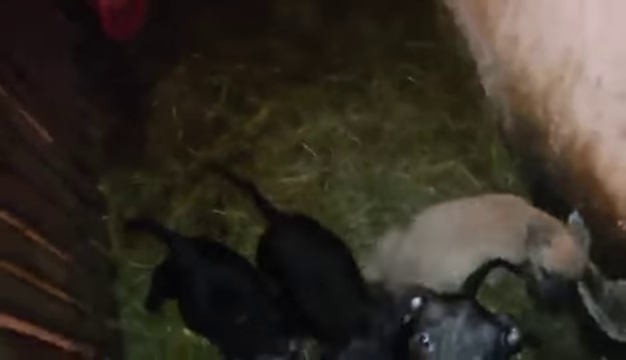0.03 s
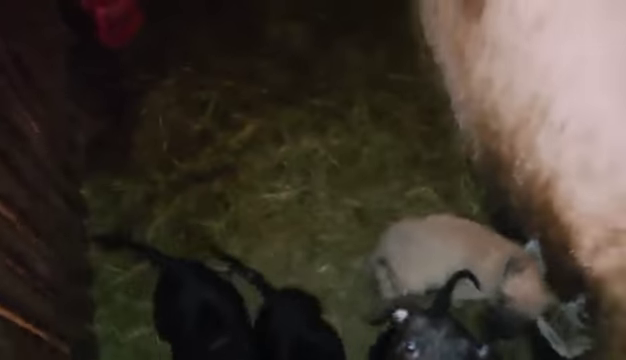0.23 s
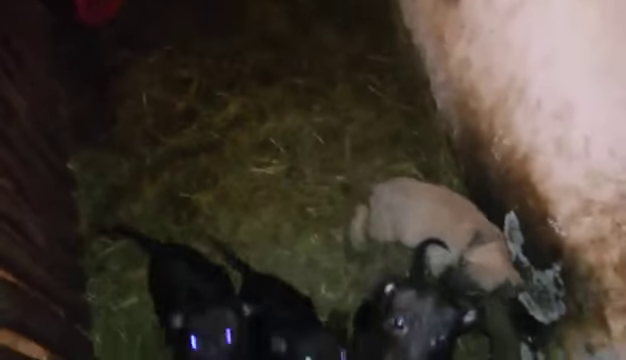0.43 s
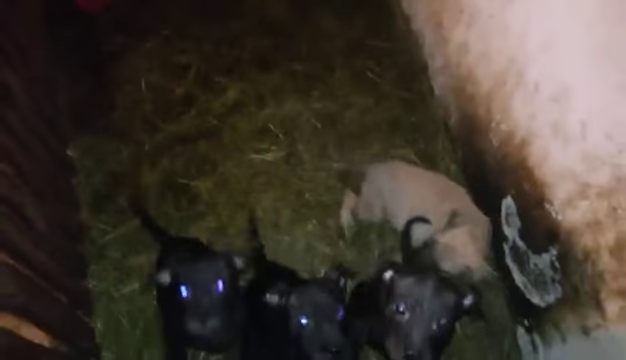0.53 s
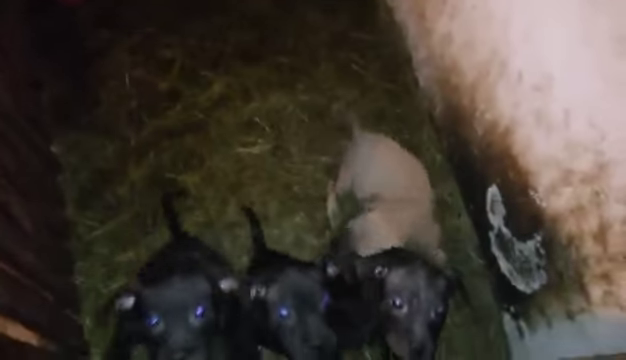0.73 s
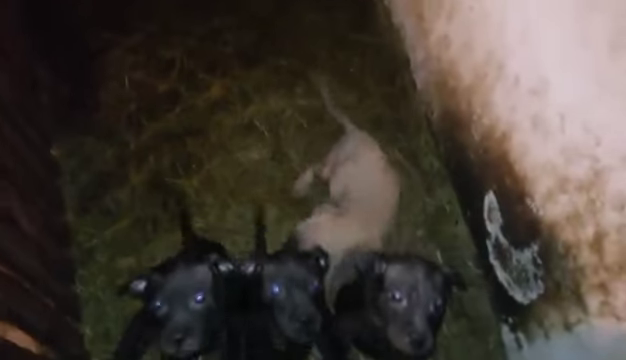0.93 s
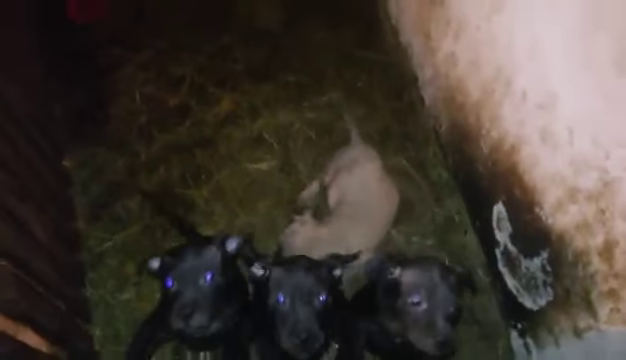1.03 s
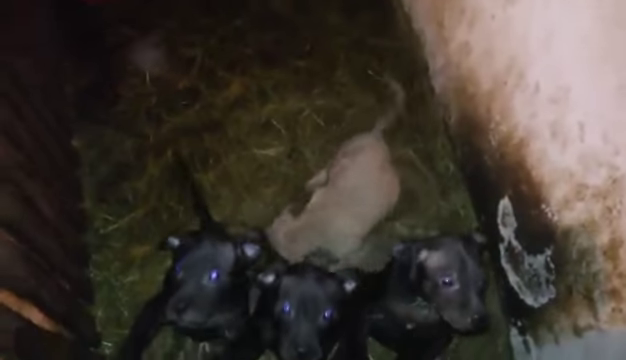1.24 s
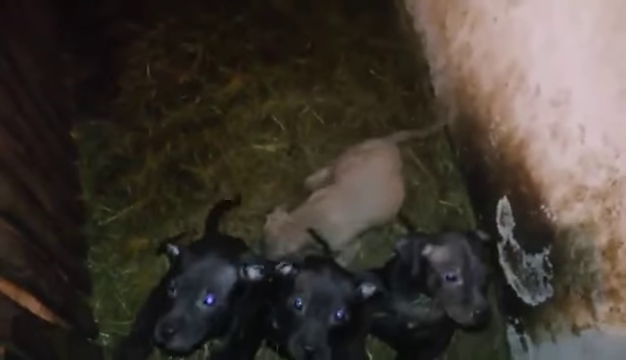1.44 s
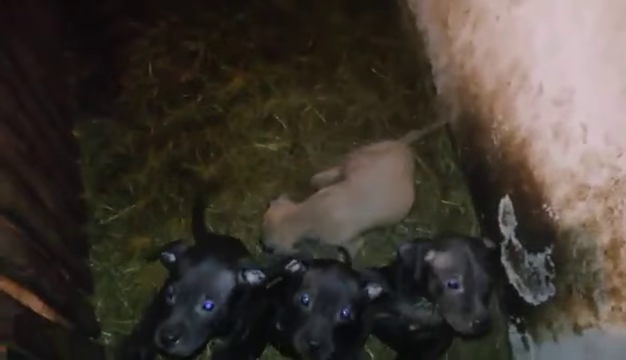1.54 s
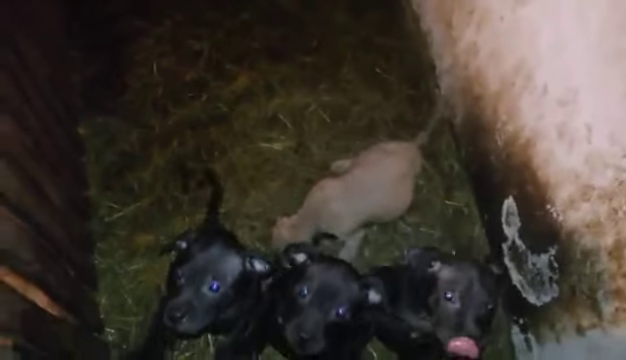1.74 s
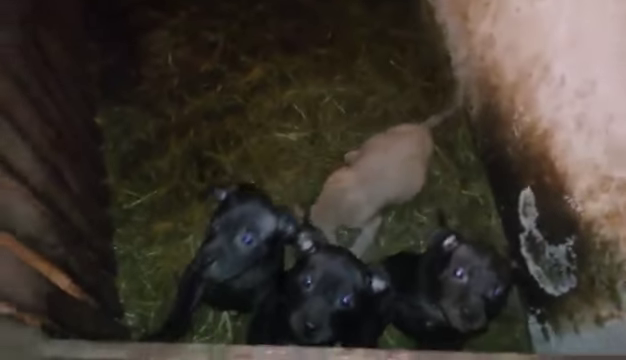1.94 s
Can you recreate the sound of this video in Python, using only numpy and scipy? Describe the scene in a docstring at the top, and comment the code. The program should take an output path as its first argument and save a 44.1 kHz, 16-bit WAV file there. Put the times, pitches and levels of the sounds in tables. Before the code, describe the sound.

Puppies rustle and crunch through straw in a small hard-walled pen, with snaps and knocks

```python
"""Straw snaps, crunches and rustles under puppies shuffling about a small hard-walled pen, close to the microphone.
Stalks and dragging paws are bursts of tiny random fractures; snaps and squeaks add narrow resonances.
Knocks ring the modes of the boards, and two soft taps right by the microphone are thuds of sagging pitch.
The pen adds a short, dense ring of decaying noise over still air, a low rumble and a faint hum."""
import sys
import numpy as np
from scipy import signal
from scipy.fft import rfft, irfft
from scipy.io import wavfile
from scipy.ndimage import uniform_filter1d

SR = 44100
rng = np.random.default_rng(int(sys.argv[2]) if len(sys.argv) > 2 else 0)


def inscribe(sig):
    """Save sig as 16-bit PCM at rate SR to the path in sys.argv[1].

    A 1-D sig is mono; a 2-D sig holds one channel per row.
    Samples are clipped to [-1, 1] before scaling.
    """
    pcm = np.round(np.clip(np.atleast_2d(sig).T, -1, 1) * 32767)
    wavfile.write(sys.argv[1], SR, pcm.astype(np.int16))


N = 88200  # 2 s

# Levels of sounds inside the pen are those sent to its walls.
# sharp snaps of straw and claws [t/s, level/dB, ring f/Hz, ring level/dB re the crack, tilt/dB per octave]
SNAPS = [(0.217, -21.5, 3493, -2.5, -4.5), (.425, -35, 3343, 5.5, -9), (0.559, -32.5, 3843, 2, 12.5),
         (0.688, -30, 3324, 7, 16.5), (.7655, -28.5, 3190, -0.5, -6), (.7835, -18.5, 4640, -33, 4.5),
         (.7955, -16.5, 4360, -1.5, 2), (0.928, -28.5, 3510, -4.5, 12), (.945, -16, 8150, -1.5, 0),
         (.962, -24.5, 4430, 4.5, 4), (.969, -25, 8250, 20, 14.5), (1.067, -25.5, 3780, -2, -0.5),
         (1.149, -38, 4720, -24, 2.5), (1.196, -35, 2200, -7, 0), (1.332, -40, 4200, -19.5, 9.5),
         (1.349, -27.5, 3354, 5.5, 5), (1.386, -29.5, 3040, -3.5, -1), (1.594, -27.5, 3660, 5, -2.5),
         (1.610, -27, 3193, 3.5, -1), (1.6726, -20.5, 4805, -0.5, -1.5), (1.6775, -15.5, 3347, 4.5, -3.5),
         (1.953, -45.5, 2940, -29, -6), (1.993, -39, 3080, -8, -4)]
# paws dragging through straw [t/s, length/s, level/dB, tilt/dB per octave]
SCRAPES = [(0.217, 0.0145, -27, -4), (0.652, 0.0413, -34, -3.5), (0.802, 0.0234, -30.5, -5),
           (0.918, 0.0227, -23, 1), (0.945, 0.02855, -21.5, -0.5), (1.068, 0.0226, -33, 1.5),
           (1.327, 0.02465, -29, -1), (1.548, 0.019, -31.5, -4), (1.596, 0.024, -30.5, -1),
           (1.681, 0.0282, -27, -3), (1.726, 0.0077, -37.5, -4.5)]
# stalks squeaking faintly against each other [t/s, length/s, f/Hz, level/dB]
SQUEAKS = [(0.498, 0.0287, 2366, -39.5), (.525, 0.0146, 3270, -42), (0.587, 0.0203, 3212, -42.5)]
# steady stirring of the bedding, before its patchiness [t/s, level/dB]
RUSTLE = [(0, -34), (.06, -46), (.15, -47), (.21, -38), (.36, -35.5), (.46, -42), (.59, -37), (.64, -42.5),
          (.75, -38.5), (.86, -38), (1.10, -46), (1.22, -41), (1.32, -55), (1.37, -40.5), (1.50, -38.5),
          (1.65, -45), (1.76, -53.5), (1.84, -50.5), (2, -58)]
# a coat brushing along the straw, silent outside these times [t/s, level/dB]
BRUSH = [(.12, -53), (.22, -33), (.28, -40.5), (.34, -33.5), (.44, -62.5)]
# dull shuffle of paws and bodies on the floor [t/s, level/dB]
SHUFFLE = [(0, -50.5), (.20, -45.5), (.25, -34), (.42, -39), (.57, -46.5), (.74, -43), (.78, -36),
           (1.02, -38), (1.10, -49.5), (1.22, -41.5), (1.51, -59.5), (1.60, -47), (1.73, -46.5),
           (1.82, -71.5), (2, -58)]
# blows against the boards [t/s, level/dB, ring level/dB re the clatter]
KNOCKS = [(0.22, -23, -2), (.229, -19, 9), (.238, -20.5, -3), (0.274, -34, 6.5), (.423, -33.5, -5),
          (.766, -33, -11.5), (1.682, -42, 0)]
# modes of the boards [f/Hz, level/dB, t60/s]
BOARD_MODES = [(95, -1, .22), (148, -7, .16), (298, -4, .5), (385, -3, .15), (485, 2, .17), (770, -5, .12),
               (1350, -17, .15)]
# soft taps right by the microphone
# [t/s, thud level/dB, settled f/Hz, starting f/Hz, t60/s, click level/dB re the thud, click f/Hz]
TAPS = [(1.0505, -14, 106.4, 484, 0.037, -38.5, 900), (1.8614, -36, 252.5, 285, 0.211, 7, 1627)]
# low rumble close to the microphone [t/s, level/dB]
RUMBLE = [(.68, -74), (.74, -53.5), (.95, -46), (1.04, -45), (1.10, -72.5)]
# relative spectra of snapping straw, stirred bedding, brushing coat, footfalls, still air [f/Hz, level/dB per Hz]
STRAW_SPECTRUM = [(150, -20), (500, -10), (1100, -13), (2000, -4.5), (3400, 0), (4500, -1), (6300, -7),
                  (8300, -10.5), (11000, -25.5), (15000, -34.5)]
BEDDING_SPECTRUM = [(200, -13.5), (600, -5.5), (1200, -7), (2200, -6.5), (3700, -0.5), (6300, -9),
                    (9000, -12), (14500, -24)]
COAT_SPECTRUM = [(1500, -30.5), (4000, 3), (7000, -3.5), (10000, 0.5), (14500, -15)]
FLOOR_SPECTRUM = [(25, -3), (50, -12.5), (92, 2.5), (125, -3), (220, -1), (310, -0.5), (500, -12.5),
                  (800, -16), (2000, -36.5)]
AIR_SPECTRUM = [(18, -61.5), (30, -18), (176, -8.5), (253, -9), (355, -13), (4200, -42), (13200, -43),
                (15000, -65)]
# decay of the pen's ring [f/Hz, t60/s]
PEN_T60 = [(150, 0.459), (700, 0.2713), (3500, 0.2308), (8000, 0.2106), (14000, 0.258)]

# mean fractures per second, and mean rise of a fracture above the weakest
SNAP_CRACKS_PER_S, SNAP_SPREAD_DB = 9000, 0.82
SCRAPE_CRACKS_PER_S, SCRAPE_SPREAD_DB = 6000, 2.5
RUSTLE_CRACKS_PER_S, RUSTLE_SPREAD_DB = 1600, 1.5
SNAP_RISE_S, SNAP_DECAY_S = 0.00185, 0.002606  # time constants
STALK_WIDTH, SQUEAK_WIDTH = .085, 0.0307  # resonance widths as a share of the pitch
SCRAPE_ATTACK_S, SCRAPE_RELEASE_S = 0.0066, 0.00737
PATCHY_DB, PATCHY_PER_S = 1.5, 45
FLOOR_RING_DB = -9  # re the footfalls
KNOCK_DECAY_S, KNOCK_HZ, KNOCK_WIDTH_HZ = 0.003126, 481.5, 386
TAP_SAG_S, TAP_CONTACT_S, TAP_CLICK_WIDTH_HZ = 0.001436, .0004, 910
TICK_S, TICK_PEAK_DB, TICK_HZ, TICK_WIDTH_HZ = .8968, -21, 2500, 7800
RUMBLE_HZ, RUMBLE_WIDTH_HZ = 59.5, 31
AIR_DB, HUM_DB, HUM_HZ = -53, -57.5, 59.56
PEN_DB, RING_PEN_DB = -1, -3  # tail re the direct sound, for everything else and for snap rings
PEN_BUILD_S, PEN_LOW_HZ = 0.00145, 254
LOW_CUT_HZ, TOP_HZ = 37, 14700


def amp(db):
    """Decibels to gain."""
    return 10 ** (np.asarray(db) / 20)


def unit(x):
    """Scale to rms 1."""
    return x / np.sqrt(np.mean(x ** 2) + 1e-20)


def die_away(t, t60):
    """Exponential decay that falls 60 dB in t60 seconds."""
    return np.exp(-np.log(1000) * t / t60)


def curve(rows):
    """Gain over the whole scene, drawn in straight dB lines through (t, level) points."""
    s, db = np.array(rows).T
    return amp(np.interp(np.arange(N) / SR, s, db))


def add(out, s, x):
    """Mix x in at time s."""
    i = int(s * SR)
    out[i:i + len(x)] += x[:max(len(out) - i, 0)]


def flicker(rate):
    """Random levels held for 1 / rate s and smoothed; spread a little under 1."""
    hold = int(SR / rate)
    steps = np.repeat(rng.standard_normal(N // hold + 1), hold)
    return uniform_filter1d(steps, hold)[:N]


def colour(x, points, tilt_db=0):
    """Minimum-phase filter of unit power through (f, level) points, tilted per octave above 1 kHz."""
    size = 4096
    hz, db = np.array(points).T
    octave = np.log2(np.maximum(np.fft.rfftfreq(size, 1 / SR), 10))
    shape = np.interp(octave, np.log2(hz), db) + tilt_db * np.maximum(octave, np.log2(1000))
    # fold the cepstrum forward in time so the filter never sounds early
    cepstrum = irfft(np.log(amp(shape)))
    cepstrum[1:size // 2] *= 2
    cepstrum[size // 2 + 1:] = 0
    h = irfft(np.exp(rfft(cepstrum)))[:size // 2]
    return signal.fftconvolve(x, h / np.linalg.norm(h))[:len(x)]


def resonate(x, hz, width):
    """One resonance, gain 1 at its centre."""
    return signal.lfilter(*signal.iirpeak(hz, hz / width, fs=SR), x)


def resonate_twice(x, hz, width, second_width):
    """Two resonances in a row at one pitch, for steeper skirts."""
    return resonate(resonate(x, hz, width), hz, second_width)


def cracks(count, rate, spread_db):
    """Random tiny fractures, mostly weak and a few strong."""
    when, size, sign = rng.random((3, count))
    strength = amp(-spread_db * np.log(np.maximum(size, .004)))
    return (when < rate / SR) * strength * np.sign(sign - .5)


def snaps():
    """A stalk gives way in a quick run of fractures and rings at its own pitch; returns cracks and rings."""
    crackle, rings = np.zeros(N), np.zeros(N)
    t = np.arange(int(.066 * SR)) / SR
    swell = (1 - np.exp(-t / SNAP_RISE_S)) * np.exp(-t / SNAP_DECAY_S)
    spread = np.sqrt(2 * (SNAP_DECAY_S + SNAP_RISE_S / 2) / t[-1])  # level counts over the burst alone
    for s, db, hz, ring_db, tilt_db in SNAPS:
        push = cracks(len(t), SNAP_CRACKS_PER_S, SNAP_SPREAD_DB) * swell
        gain = amp(db) * spread / np.hypot(1, amp(ring_db))
        crack = unit(colour(push, STRAW_SPECTRUM, tilt_db))
        ring = unit(resonate_twice(push, hz, hz * STALK_WIDTH, hz / 2))
        add(crackle, s, gain * crack)
        add(rings, s, gain * amp(ring_db) * ring)
    return crackle, rings


def scrapes():
    """A dragging paw crushes many stalks for as long as it moves."""
    out, t = np.zeros(N), np.arange(SR // 10) / SR
    for s, length, db, tilt_db in SCRAPES:
        release = np.exp(-np.maximum(t - length, 0) / SCRAPE_RELEASE_S)
        press = np.minimum(t / SCRAPE_ATTACK_S, 1) * release
        fractures = cracks(len(t), SCRAPE_CRACKS_PER_S, SCRAPE_SPREAD_DB) * press
        crunch = unit(colour(fractures, STRAW_SPECTRUM, tilt_db))
        add(out, s, amp(db) * crunch * np.sqrt(length / t[-1]))
    return out


def squeaks():
    """Stalks rub together; the noise of it keeps one narrow resonance going."""
    out = np.zeros(N)
    for s, length, hz, db in SQUEAKS:
        rub = rng.standard_normal(int(length * SR))
        tone = resonate_twice(rub, hz, hz * SQUEAK_WIDTH, hz * SQUEAK_WIDTH)
        add(out, s, amp(db) * unit(tone * np.hanning(len(rub))))
    return out


def rustle():
    """Stirred bedding crackles finely and patchily as scattered stalks fracture."""
    crackle = unit(colour(cracks(N, RUSTLE_CRACKS_PER_S, RUSTLE_SPREAD_DB), BEDDING_SPECTRUM))
    return crackle * curve(RUSTLE) * amp(PATCHY_DB * flicker(PATCHY_PER_S))


def brush():
    """A coat sliding along the straw hisses as coloured noise."""
    t = np.arange(N) / SR
    touching = (t > BRUSH[0][0]) & (t < BRUSH[-1][0])
    return unit(colour(rng.standard_normal(N), COAT_SPECTRUM)) * curve(BRUSH) * touching


def shuffle():
    """Dull footfalls, many small random impacts, stir the modes of the boards."""
    steps = unit(colour(cracks(N, rate=700, spread_db=1.5), FLOOR_SPECTRUM))
    boards = np.zeros(N)
    for hz, db, t60 in BOARD_MODES:
        width = np.log(1000) / np.pi / t60  # a longer ring is a narrower resonance
        boards += amp(db) * resonate(steps, hz, width)
    return unit(steps + amp(FLOOR_RING_DB) * unit(boards)) * curve(SHUFFLE)


def knocks():
    """Each blow gives a dull clatter of noise and rings the boards, each mode slightly detuned."""
    out, t = np.zeros(N), np.arange(SR // 2) / SR
    for s, db, ring_db in KNOCKS:
        blow = rng.standard_normal(len(t)) * np.exp(-t / KNOCK_DECAY_S)
        clatter = resonate_twice(blow, KNOCK_HZ, KNOCK_WIDTH_HZ, 2 * KNOCK_WIDTH_HZ)
        ring = np.zeros(len(t))
        for hz, mode_db, t60 in BOARD_MODES:
            pitch = hz * (1 + .01 * rng.standard_normal())
            ring += amp(mode_db) * die_away(t, t60) * np.sin(2 * np.pi * pitch * t)
        knock = unit(unit(clatter) + amp(ring_db) * unit(ring))
        add(out, s, amp(db) * knock * np.sqrt(2 * KNOCK_DECAY_S / t[-1]))
    return out


def taps():
    """A dry thud whose pitch sags as the contact relaxes, with a click at its start."""
    out, t = np.zeros(N), np.arange(SR // 4) / SR
    contact = np.exp(-t / TAP_CONTACT_S)
    for s, db, hz, start_hz, t60, click_db, click_hz in TAPS:
        pitch = hz + (start_hz - hz) * np.exp(-t / TAP_SAG_S)
        thud = np.sin(2 * np.pi * np.cumsum(pitch) / SR) * die_away(t, t60)
        click = resonate_twice(contact, click_hz, TAP_CLICK_WIDTH_HZ, 2 * TAP_CLICK_WIDTH_HZ)
        add(out, s, amp(db) * (thud + amp(click_db) * click / np.abs(click).max()))
    return out


def tick():
    """One impulse through a very broad resonance makes a dry tick at the microphone."""
    out = np.zeros(N)
    pulse = resonate(signal.unit_impulse(SR // 100), TICK_HZ, TICK_WIDTH_HZ)
    add(out, TICK_S, amp(TICK_PEAK_DB) * pulse / np.abs(pulse).max())
    return out


def rumble():
    """Narrow low noise swells and fades close to the microphone."""
    noise = rng.standard_normal(N)
    return unit(resonate_twice(noise, RUMBLE_HZ, RUMBLE_WIDTH_HZ, RUMBLE_WIDTH_HZ)) * curve(RUMBLE)


def background():
    """Still air as soft coloured noise, and a faint hum as a steady sine."""
    air = unit(colour(rng.standard_normal(N), AIR_SPECTRUM))
    hum = np.sqrt(2) * np.sin(2 * np.pi * HUM_HZ * np.arange(N) / SR)
    return amp(AIR_DB) * air + amp(HUM_DB) * hum


def pen(x, wet_db):
    """Close walls return a dense noise tail, thin in the bass, whose decay time varies with pitch."""
    t = np.arange(SR // 2) / SR
    band_hz, band_t60 = np.array(PEN_T60).T
    f = np.fft.rfftfreq(len(t), 1 / SR)
    noise = rfft(rng.standard_normal(len(t))) * f ** 2 / (f ** 2 + PEN_LOW_HZ ** 2)
    tail = np.zeros(len(t))
    # overlapping bands whose shares sum to 1
    for peak, t60 in zip(np.eye(len(band_hz)), band_t60):
        share = np.interp(np.log(f + 1), np.log(band_hz), peak)
        tail += irfft(noise * share, len(t)) * die_away(t, t60)
    tail *= 1 - np.exp(-t / PEN_BUILD_S)
    wet = signal.fftconvolve(x, tail / np.linalg.norm(tail))[:N]
    return (x + amp(wet_db) * wet) / np.hypot(1, amp(wet_db))


def scene():
    """Everything in the pen rings off its walls; sounds at the microphone and the background stay dry."""
    crackle, rings = snaps()
    straw = crackle + scrapes() + squeaks() + rustle() + brush()
    inside = pen(straw + shuffle() + knocks(), PEN_DB) + pen(rings, RING_PEN_DB)
    close_by = taps() + tick() + rumble()
    return (inside + close_by + background())[None]


def record(dry):
    """The microphone thins the deep bass and the recorder cuts the top."""
    thin = signal.sosfilt(signal.butter(2, LOW_CUT_HZ, "high", fs=SR, output="sos"), dry)
    return signal.sosfilt(signal.ellip(10, .2, 80, TOP_HZ, fs=SR, output="sos"), thin)


dry = scene()
out = record(dry)
inscribe(out)
```